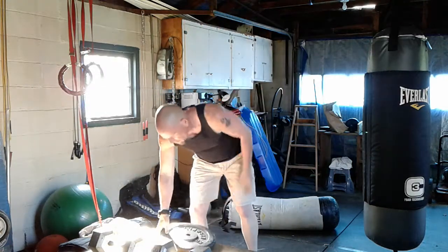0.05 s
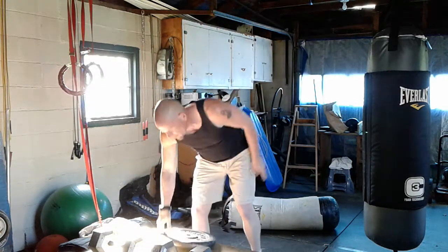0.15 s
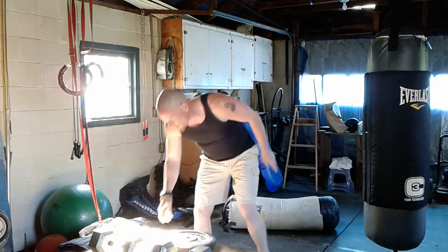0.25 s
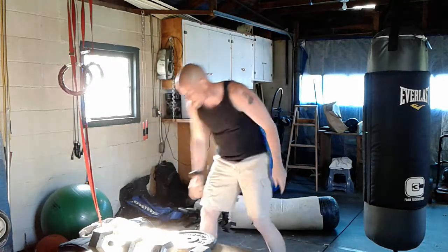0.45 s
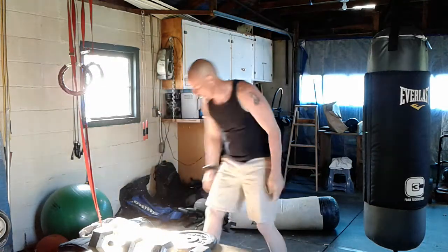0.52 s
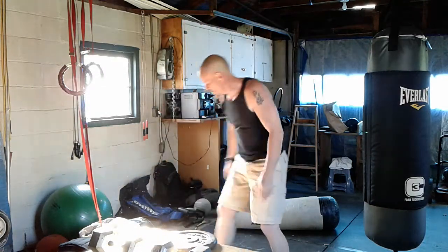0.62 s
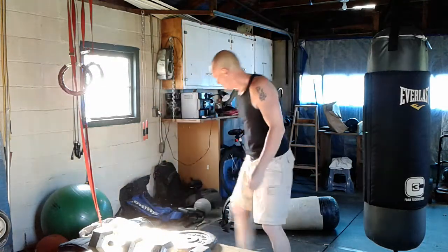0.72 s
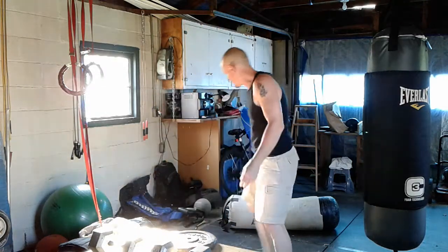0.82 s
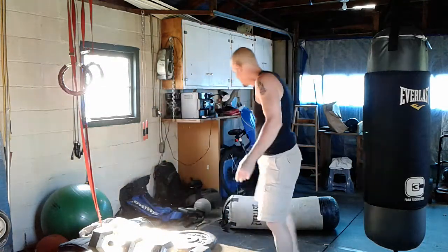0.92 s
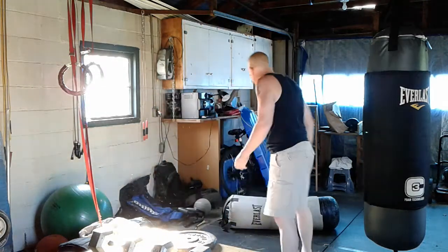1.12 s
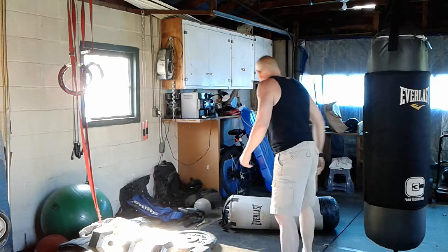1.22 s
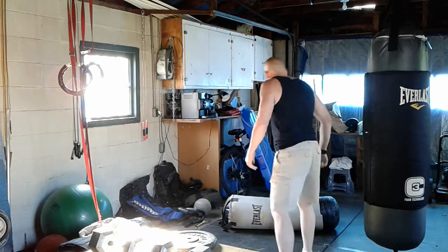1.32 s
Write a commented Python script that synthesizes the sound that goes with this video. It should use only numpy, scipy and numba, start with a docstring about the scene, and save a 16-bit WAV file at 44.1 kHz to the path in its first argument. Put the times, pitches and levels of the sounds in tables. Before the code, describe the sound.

A heavy weight scrapes briefly on the floor, then thuds, rocks and lands with a sharp clack, ringing a little and booming in a small garage. Faint steps and tiny clicks follow over a quiet hush.

```python
"""First comes a gritty scrape as a heavy weight shifts and rocks on the floor of a garage gym.
The weight is let down: it thuds, rocks and lands with a sharp clack. Each blow rings the weight
briefly, booms in the floor and fills the small room. Faint clicks and steps follow, over a quiet hush.
A limiter flattens the loud blows, so their tails seem to hold before they fall."""
import sys
import numpy as np
from scipy import signal
from scipy.fft import rfft, irfft
from scipy.io import wavfile
from numba import njit

SR = 44100
rng = np.random.default_rng(int(sys.argv[2]) if len(sys.argv) > 2 else 0)


def generate_wav(signal):
    """Clip the signal to [-1, 1] and save it as 16-bit WAV at the path in sys.argv[1]."""
    frames = np.transpose(np.atleast_2d(signal))
    scaled = np.clip(frames, -1, 1) * 32767
    pcm = np.round(scaled).astype(np.int16)
    wavfile.write(sys.argv[1], SR, pcm)


N = 59535
T = np.arange(N) / SR
FREQS = np.maximum(np.fft.rfftfreq(N, 1 / SR), 1)
BOOM_DELAY_S = .004  # the floor answers a moment after a contact


def undb(db):
    """Turn decibels into a number to multiply a sound by."""
    return 10 ** (np.asarray(db) / 20)


def across(points):
    """Read a table of (frequency, value) at every frequency."""
    hz, value = np.array(points, float).T
    return np.interp(np.log(FREQS), np.log(hz), value)


def swell(rise_s):
    """A curve that climbs from 0 towards 1."""
    return 1 - np.exp(-T / rise_s)


def fade(fade_s):
    """A curve that falls by 60 dB in the fade time."""
    return np.exp(-np.log(1000) * T / fade_s)


def delayed(x, start):
    """Move a sound to its starting time."""
    return np.pad(x, ((0, 0), (int(start * SR), 0)))[:, :N]


def coloured(x, colour):
    """Make some frequencies louder and others quieter, following a table."""
    cepstrum = irfft(across(colour) * np.log(10) / 20, N)
    # folding this in half keeps the filter from sounding before the hit
    cepstrum[1:N // 2] *= 2
    cepstrum[N // 2:] = 0
    response = irfft(np.exp(rfft(cepstrum)), N)[:N // 10]
    return signal.fftconvolve(x, response[None], axes=1)[:, :N]


# how alike the two ears are (frequency [Hz], likeness [0 to 1])
EAR_LIKENESS = [(100, 0.96), (280, .92), (550, 0.88), (1000, 0.19), (4000, 0.12)]
def stereo_spectrum():
    """The spectrum of white noise, alike in both ears in the bass and mostly unrelated in the treble."""
    shared, opposite = rfft(rng.standard_normal((2, N)))
    alike = across(EAR_LIKENESS)
    return shared * np.sqrt((1 + alike) / 2) + opposite * np.sqrt((1 - alike) / 2) * [[1], [-1]]


def noise(colour):
    """Steady stereo noise of the given tone colour, with a strength of 1."""
    x = irfft(stereo_spectrum() * undb(across(colour)), N)
    return x / x.std()


# tone colour of the background (frequency [Hz], level [dB])
HUSH_COLOUR = [(25, -10.5), (60, -3.5), (110, -4), (200, -3.5), (300, -15), (600, -15), (1200, -16),
               (3000, -22), (8000, -29), (15000, -33)]
def hush():
    """The quiet, low background of the garage, there from start to end."""
    return noise(HUSH_COLOUR) * undb(-68.5)


# how loud the scrape is as it goes (time [s], level [dB])
SCRAPE_LEVELS = [(0, -33.5), (0.04, -45), (0.075, -46), (0.11, -47.5), (0.14, -37.5), (0.18, -42),
                 (0.215, -43.5), (0.25, -71.5)]
# tone colour of the scrape (frequency [Hz], level [dB])
SCRAPE_COLOUR = [(40, -12.5), (95, 17), (170, 19), (260, -0.5), (350, 9.5), (420, 3.5), (550, 13),
                 (730, -0.5), (850, 7.5), (1300, -8), (1750, -1.5), (2500, -11.5), (2900, -5.5),
                 (3300, -15.5), (7000, -22.5), (9000, -29), (15000, -25)]
def scrape(grains_per_s=300, grain_db=2):
    """The weight rubs on the floor; quick random wobbles in level make it gritty."""
    grain = np.interp(T * grains_per_s, np.arange(N), rng.standard_normal(N))
    times, levels = np.array(SCRAPE_LEVELS).T
    level_db = np.interp(T, times, levels, right=-np.inf)  # silent after the last row
    return noise(SCRAPE_COLOUR) * undb(level_db + grain_db * grain)


# how long the garage echoes (frequency [Hz], fade time [s])
ROOM_FADES = [(60, .55), (200, 0.41), (600, 0.34), (1500, 0.35), (5000, 0.36), (13000, 0.25)]
def knock(crack_db, crack_decay_s=.0045):
    """One contact: a short crack, then a wash of echoes whose treble dies first."""
    spectrum = stereo_spectrum()
    crack = irfft(spectrum, N) * swell(rise_s=.0013) * np.exp(-T / crack_decay_s)
    echoes = 0
    for band_hz, fade_s in ROOM_FADES:
        band = across([(hz, hz == band_hz) for hz, _ in ROOM_FADES])
        echoes = echoes + irfft(spectrum * band, N) * fade(fade_s)
    return .2 * (crack * undb(crack_db) + echoes * swell(rise_s=.0054))


def softened(x, cutoff_hz):
    """A softer contact pushes for longer and loses its treble."""
    return signal.lfilter(*signal.butter(1, cutoff_hz, fs=SR), x)


def struck_tones(tones, spread_radians):
    """The fading tones of something struck, each reaching the two ears a little out of step."""
    out = 0
    for hz, db, fade_s in tones:
        phase = spread_radians * rng.choice([-1, 1]) * np.array([[.5], [-.5]])
        out = out + undb(db) * np.sin(2 * np.pi * hz * T + phase) * fade(fade_s)
    return out


# the weight's own tones (frequency [Hz], level [dB], fade time [s])
WEIGHT_TONES = [(471.6, -41.5, .28), (518.6, -48, 0.43), (533.5, -30, .08), (567, -41, .42),
                (675.5, -37.5, .15), (814, -54.5, .42), (911.5, -40.5, 0.22), (922, -41.5, 0.12),
                (988, -40, 0.31), (1125, -50, 0.22), (1158, -37, 0.14), (1395, -53, 0.19), (1947, -44, .09),
                (1997, -56, 0.19), (2230, -44.5, .08), (2864, -47.5, 0.18), (5550, -35.5, .015)]
def weight_ring():
    """The weight shivers briefly after it is struck."""
    return struck_tones(WEIGHT_TONES, spread_radians=.55) * swell(rise_s=.0025)


# the floor's own tones (frequency [Hz], level [dB], fade time [s])
FLOOR_TONES = [(93.4, -28, 0.33), (113, -27, .42), (173.04, -18.5, 0.28), (196.07, -20, 0.39),
               (207.9, -16.5, 0.2), (213, -31.5, 0.19), (273, -31.5, 0.29), (309, -36.5, .42)]
def floor_boom():
    """The floor shakes with low tones that swell just after a push."""
    return struck_tones(FLOOR_TONES, spread_radians=.2) * swell(rise_s=.0034)


# the weight hitting the floor; the last four rows are the light rocking that is heard first
# (time [s], knock level [dB], treble cutoff [Hz], crack over echoes [dB], ring [dB], boom [dB])
WEIGHT_BLOWS = [(0.2170, 2.5, 2350, 9, 6, 5.5), (0.2515, 10, 1490, 4, 11, -16),
                (0.2575, 15.5, 1178, 1.5, 23.5, 8.5), (0.2720, 14, 2400, 9.5, 7, -5),
                (0.308, 8, 707, 6.5, 4, -5), (0.3825, 2, 1590, 2.5, 4.5, -18.5),
                (0.3915, 20.5, 7000, 6.5, 25, 5.5), (0.4230, 14, 2080, -3, 19, 1),
                (0.4750, 6, 1500, 4.5, 0.5, -4), (0.5200, 4.5, 495.6, 12, -4, -17),
                (0.001, -19.5, 500, -18, -15.5, -15), (0.018, -14.5, 900, 3, -16, -18.5),
                (0.099, -15.5, 700, -5, -17, -30.5), (0.147, -17, 700, -17.5, -4.5, -12.5)]
# tone colour of the knocks (frequency [Hz], level [dB])
KNOCK_COLOUR = [(22, -31), (45, -19.5), (65, -14), (95, -1.5), (190, 6.5), (260, -1.5), (390, -4.5),
                (570, 7), (780, -1.5), (1170, -2), (1300, -12.5), (2300, -10.5), (3300, -18), (5500, -20),
                (9000, -30), (12000, -31.5), (15000, -40)]
# which side the weight is louder on (frequency [Hz], left minus right [dB])
WEIGHT_BALANCE = [(60, -1.5), (200, -2.55), (380, 0.15), (650, 1.85), (1100, 0), (2400, 1.5), (8000, 0.36)]
def weight_blows(boom):
    """Every blow knocks, rings the weight and sets the floor booming."""
    ring = weight_ring()
    knocks, rings, booms = np.zeros((3, 2, N))
    for start, db, cutoff_hz, crack_db, ring_db, boom_db in WEIGHT_BLOWS:
        knocks += delayed(undb(db) * softened(knock(crack_db), cutoff_hz), start)
        rings += delayed(undb(ring_db) * softened(ring, cutoff_hz), start)
        booms += delayed(undb(boom_db) * boom, start + BOOM_DELAY_S)
    blows = coloured(knocks, KNOCK_COLOUR) + rings + booms
    left = coloured(blows[:1], [(hz, db / 2) for hz, db in WEIGHT_BALANCE])
    right = coloured(blows[1:], [(hz, -db / 2) for hz, db in WEIGHT_BALANCE])
    return np.vstack([left, right])


# grit and gear underfoot (time [s], level [dB], ring pitch [Hz], ring width [Hz], ring level [dB])
GRIT_CLICKS = [(0.744, -42.5, 1880, 478, 13.5), (1.2148, -24, 11700, 500, -1),
               (1.324, -40.5, 4610, 912, 5.5)]
# tone colour of the clicks (frequency [Hz], level [dB])
CLICK_COLOUR = [(30, -16), (300, -12), (700, 3), (1100, -4), (2000, -3), (4000, -4), (9000, -16.5),
                (12000, -15), (15500, -22)]
def clicks():
    """Small hard contacts, each ringing very briefly around a pitch of its own."""
    out = 0
    for start, db, hz, width_hz, ring_db in GRIT_CLICKS:
        tick = knock(crack_db=8)
        ring = signal.lfilter(*signal.iirpeak(hz, hz / width_hz, fs=SR), tick)
        out = out + delayed(undb(db) * (tick + undb(ring_db) * ring), start)
    return coloured(out, CLICK_COLOUR)


# soft steps (time [s], pat level [dB], treble cutoff [Hz], boom [dB])
FOOTFALLS = [(0.748, -21, 79.8, -44), (0.887, -26.5, 70.2, -50), (0.940, -26, 69.8, -45.5),
             (1.132, -30, 593, -55), (1.169, -29, 900, -59), (1.179, -19.5, 780, -42)]
# tone colour of the pats (frequency [Hz], level [dB])
PAT_COLOUR = [(25, -12), (110, 1.5), (300, 2), (600, 6), (1100, -4), (1400, -19), (3500, -7.5),
              (6000, -17.5), (12000, -19)]
def footsteps(boom):
    """Soft soles pat the floor and make it boom a little."""
    pats, booms = np.zeros((2, 2, N))
    for start, db, cutoff_hz, boom_db in FOOTFALLS:
        pats += delayed(undb(db) * softened(knock(crack_db=7.5), cutoff_hz), start)
        booms += delayed(undb(boom_db) * boom, start + BOOM_DELAY_S)
    return coloured(pats, PAT_COLOUR) + booms


def scene():
    """The still room, the weight and the feet; weight and feet shake the same floor."""
    boom = floor_boom()
    return hush() + scrape() + weight_blows(boom) + clicks() + footsteps(boom)


@njit
def follow_peaks(x, rise_s, fall_s):
    """Track how loud a sound is, at one speed going up and another coming down."""
    out, level = np.empty(len(x)), 0.
    for i in range(len(x)):
        lag_s = rise_s if x[i] > level else fall_s
        level += (x[i] - level) / (1 + lag_s * SR)
        out[i] = level
    return out


def record(dry, limit_db=-3.5, ratio=10, low_cut_hz=35, high_cut_hz=15800):
    """A fast limiter turns the loud blows down; deep rumble and the highest treble are cut."""
    peak = follow_peaks(np.abs(dry).max(axis=0), rise_s=.001, fall_s=.072)
    gain = np.maximum(peak / undb(limit_db), 1) ** (1 / ratio - 1)
    x = signal.lfilter(*signal.butter(2, low_cut_hz, "high", fs=SR), dry * gain)
    x = x / (1 + x ** 6) ** (1 / 6)  # round off the peaks that slip through
    return signal.sosfilt(signal.ellip(8, .2, 70, high_cut_hz, fs=SR, output="sos"), x)


dry = scene()
out = record(dry)
generate_wav(out)
```